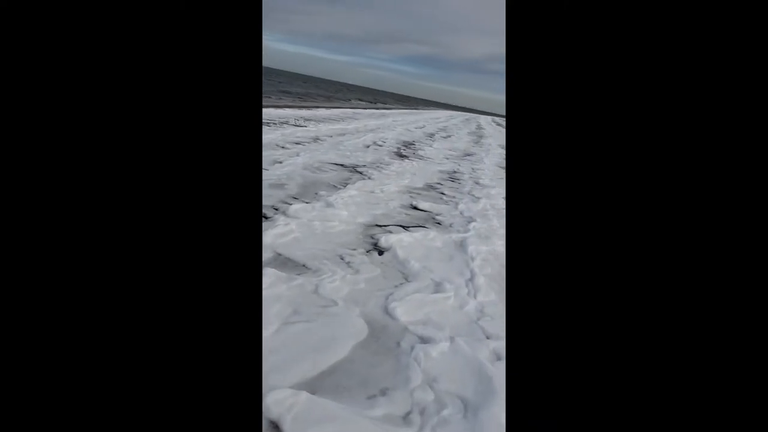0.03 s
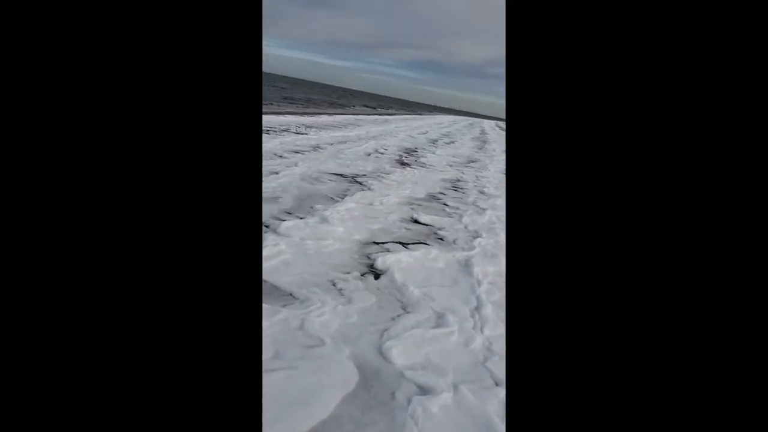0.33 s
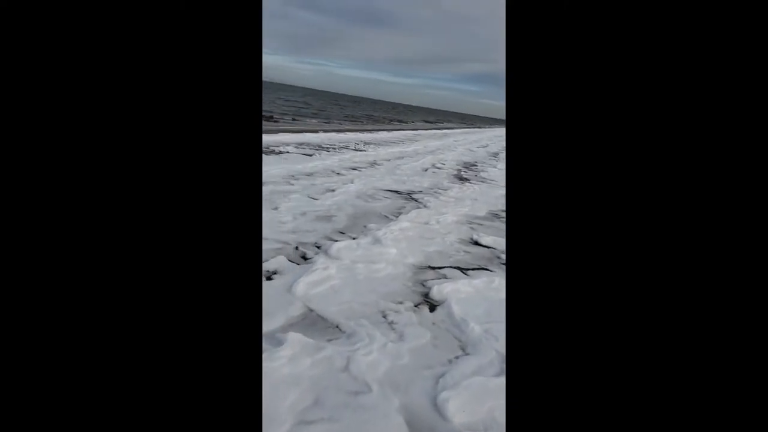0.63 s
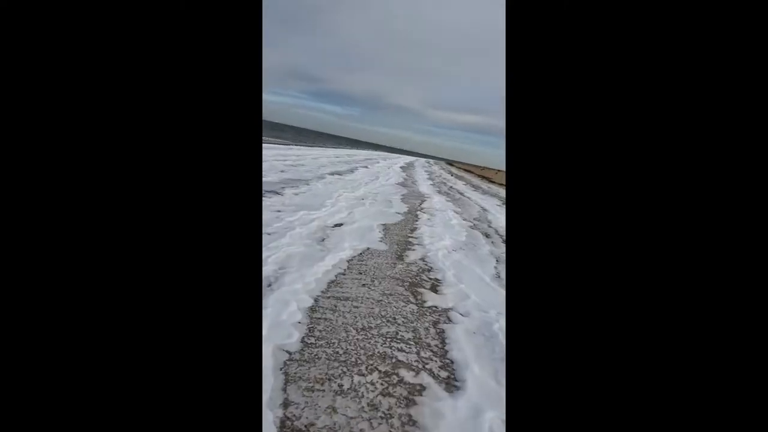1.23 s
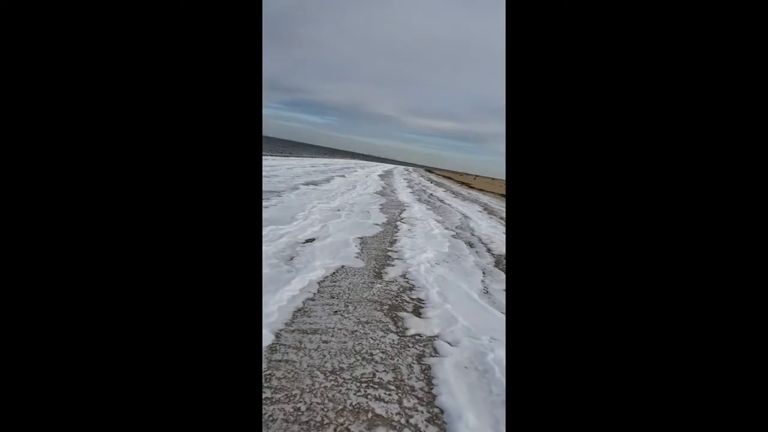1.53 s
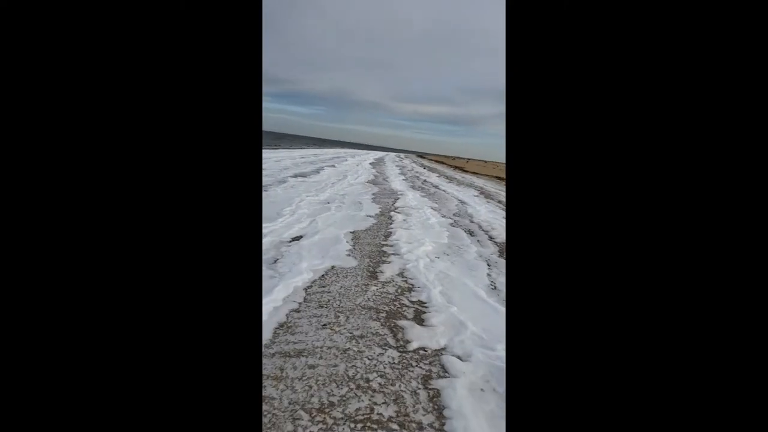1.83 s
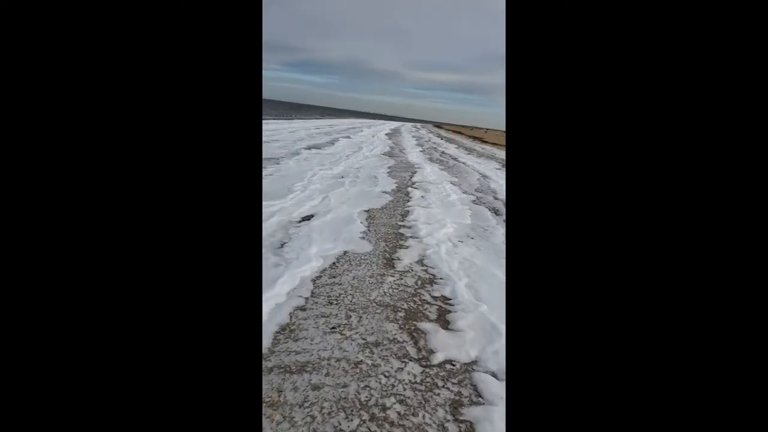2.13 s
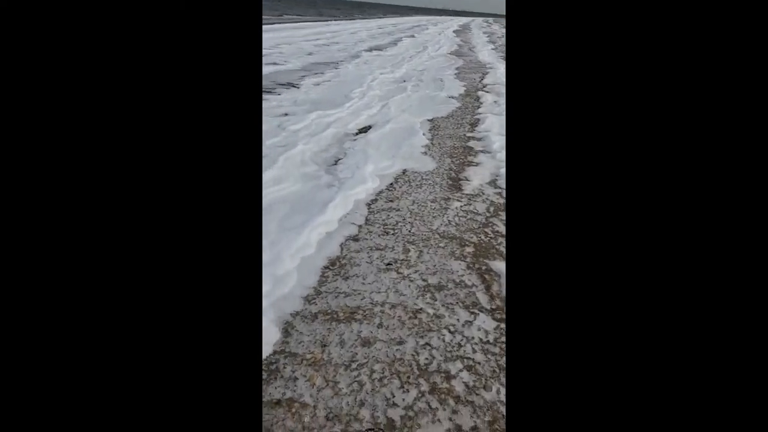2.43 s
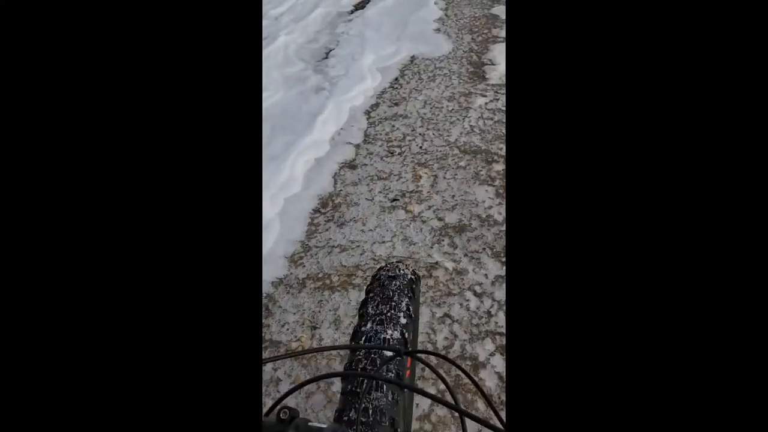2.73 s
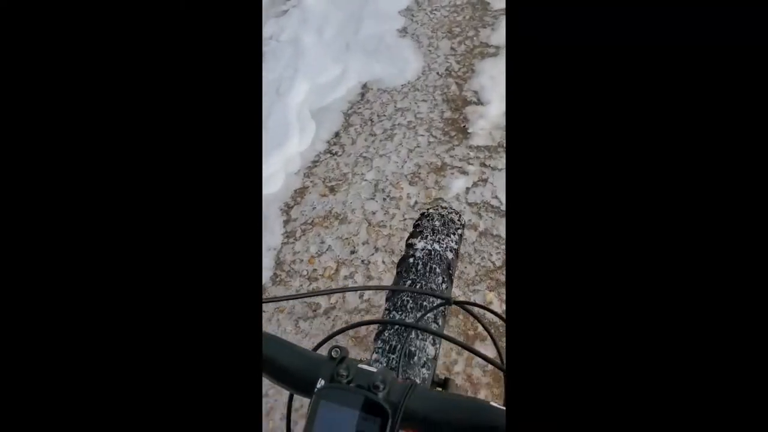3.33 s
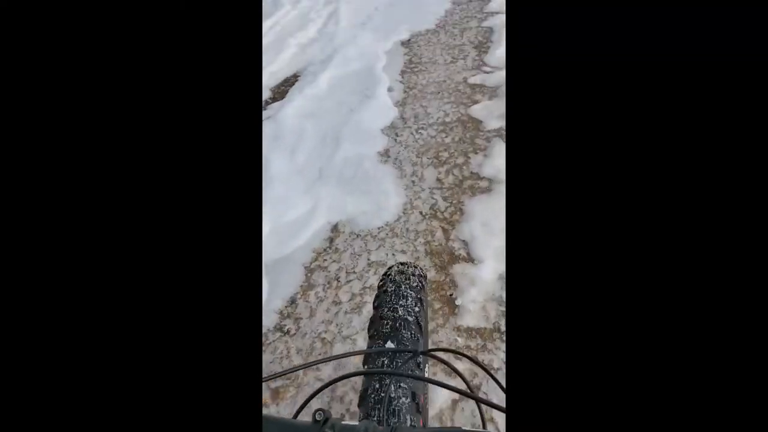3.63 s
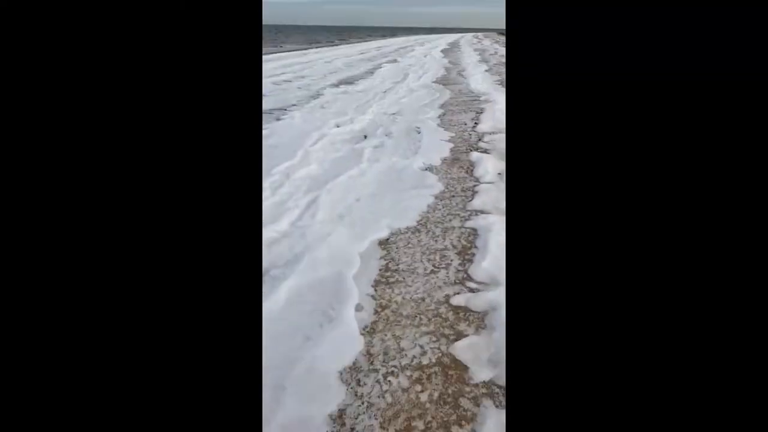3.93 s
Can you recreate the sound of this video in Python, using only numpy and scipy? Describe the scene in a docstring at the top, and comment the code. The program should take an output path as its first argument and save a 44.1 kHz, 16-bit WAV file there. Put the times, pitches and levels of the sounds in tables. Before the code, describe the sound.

A bicycle tyre crunches over crusted snow, then frozen sand, with wind buffeting the microphone.

```python
"""Bicycle on a frozen beach

Heard from a two-port microphone on the rider's chest. A wide tyre crunches through crusted snow;
after a short silent gap it runs on frozen sand, quieter. The crust breaks in dull snaps and the
tread flings ice grit. Wind buffets the ports, hardest around the middle, over a thin hiss."""
import sys
import numpy as np
from scipy import signal
from scipy.fft import rfft, irfft, next_fast_len
from scipy.io import wavfile
from scipy.ndimage import map_coordinates

SR = 44100
rng = np.random.default_rng(int(sys.argv[2]) if len(sys.argv) > 2 else 0)


def pcm_store(signal):
    """Save signal as 16-bit PCM."""
    levels = np.round(np.clip(np.atleast_2d(signal), -1, 1) * 32767)
    wavfile.write(sys.argv[1], SR, levels.astype(np.int16).T)


N = 176400
GAP_START_S, GAP_END_S = 1.048, 1.080


# Snow under the tyre, a body's length from the microphone.
# Each row: time in seconds, relative level in dB.
SNOW_LEVEL = [(0, -34.5), (.11, -36.5), (.2, -38), (.23, -36.5), (.28, -38), (.32, -40.5), (.39, -37.5),
              (.425, -44), (.445, -36), (.52, -43), (.63, -41), (.70, -34), (.77, -40), (.85, -43.5),
              (.9, -40.5), (1.04, -39.5)]
# Each row: frequency in Hz, relative level in dB.
SNOW_SPECTRUM = [(100, -21.5), (250, -3), (550, -3), (850, -2), (1250, -11), (1600, -9), (2000, -13),
                 (2900, -15), (4000, -28.5), (6500, -39.5), (12000, -40)]

def snow():
    """The tyre crushes the crust; the pockets beneath stand out more the harder it presses."""
    press_db = curve(SNOW_LEVEL)
    crust = crunch(SNOW_SPECTRUM, per_s=4000, spread_db=3, clumps_per_s=120, clumped=0.51, rush_db=-3)
    pockets_db = 0.5 + 0.75 * (press_db + 36)  # -36 dB is a firm press
    return amp(press_db) * (amp(6) * crust + amp(pockets_db) * snow_pockets())


# Frozen sand under the same tyre. Each row: time in seconds, relative level in dB.
SAND_LEVEL = [(1.09, -45.5), (1.17, -44), (1.27, -49.5), (1.38, -44), (1.68, -45), (1.87, -48), (2.06, -46),
              (2.25, -46), (2.66, -48), (2.83, -46), (2.95, -50), (3.1, -43), (3.29, -47.5), (3.34, -45),
              (3.42, -48.5), (3.51, -41.5), (3.72, -48.5), (4.0, -46.5)]
# Each row: frequency in Hz, relative level in dB.
SAND_SPECTRUM = [(150, -15.5), (350, 2.5), (1450, -1), (1850, 0), (2150, -8), (2500, -12.5), (3200, -18),
                 (5000, -31), (8000, -41)]

def sand():
    """Frozen sand breaks in fewer, more uneven fractures than snow."""
    crust = crunch(SAND_SPECTRUM, per_s=3000, spread_db=4.5, clumps_per_s=80, clumped=0.8, rush_db=-2.5)
    return amp(curve(SAND_LEVEL) + 4.5) * crust


def crunch(spectrum, per_s, spread_db, clumps_per_s, clumped, rush_db, clump_decay_s=0.0056):
    """Countless fractures under the tread, in clumps that start at once and fade, in a diffuse rush."""
    fade = np.exp(-np.arange(SR // 10) / SR / clump_decay_s)
    clumps = unit(signal.fftconvolve(np.abs(grains(clumps_per_s, 2.4)), fade)[:N])
    fractures = grains(per_s, spread_db) * (1 - clumped + clumped * clumps)
    return unit(ports(crackle(fractures, spectrum)) + amp(rush_db) * surround(spectrum))


def snow_pockets(count=600, pitch_hz=729, scatter_octaves=0.231, t60_s=0.021):
    """Pockets under the snow crust collapse, each ringing briefly at its own pitch."""
    out, t = np.zeros(N + SR), np.arange(SR // 10) / SR
    starts = (np.arange(count) + rng.random(count)) * N / count
    pitches = pitch_hz * 2 ** (scatter_octaves * rng.standard_normal(count))
    for start, hz in zip(starts, pitches):
        out[int(start):][:len(t)] += np.sin(2 * np.pi * hz * t) * amp(-60 * t / t60_s)
    return unit(ports(out[:N]))


# Crust snapping down at the wheel.
# Each row: start in seconds, relative level in dB, resonance of the breaking piece in Hz.
SNAPS = [(.111, -14.5, 2380), (0.392, -22, 800), (.444, -31, 2000), (1.169, -23, 2350), (1.188, -25.5, 740),
         (1.476, -21, 854), (1.516, -23, 1130), (1.609, -28.5, 444), (1.662, -21.5, 1910),
         (1.672, -22, 1500), (1.741, -23.5, 990), (2.134, -26, 1510), (2.314, -21, 750), (2.714, -19, 880),
         (2.819, -20, 1770), (2.832, -22, 1240), (1.579, -27, 920), (1.959, -31.5, 580),
         (2.987, -23.5, 1340), (3.055, -21.5, 1500), (3.071, -16, 1020), (3.088, -17, 650),
         (3.0951, -18, 790), (3.1490, -20.5, 706), (3.166, -15, 1280), (3.335, -25, 1570),
         (3.475, -25, 640), (3.513, -16, 2500), (3.550, -14, 1640), (3.624, -16.5, 840),
         (3.661, -26.5, 660), (3.693, -26, 905)]
# Each row: frequency in Hz, relative level in dB.
SNAP_SPECTRUM = [(80, -9.5), (380, 5), (1350, 3.5), (1900, 4.5), (2400, -10), (3300, -23), (6000, -22),
                 (14000, -48)]

def snaps(step_gap_s=0.001772, crumb_t60_s=0.08):
    """The crust gives way in two quick steps, coloured by the breaking piece; faint crumbs follow."""
    out, t = np.zeros(N + SR), np.arange(SR // 10) / SR
    for start, db, ring_hz in SNAPS:
        force = rng.standard_normal(len(t)) * amp(-23.5 - 60 * t / crumb_t60_s) / 2  # crumbs
        force[0] = -1
        second_step = int(step_gap_s * SR * (.5 + rng.random()))
        force[second_step] -= amp(-8.5)
        snap = amp(db + 2.5) * signal.fftconvolve(force, click(SNAP_SPECTRUM, ring_hz))
        out[round(start * SR):][:len(snap)] += snap
    return ports(out[:N], lag_s=0.00027)


# Ice grit below the microphone. Each row: start in seconds, length in seconds, relative level in dB.
SPRAYS = [(0.913, 0.015, -36), (1.193, 0.06, -51), (1.657, 0.051, -44.5), (1.843, 0.083, -51),
          (2.221, 0.11, -49), (2.828, 0.097, -53), (3.073, 0.093, -49.5)]
# Each row: frequency in Hz, relative level in dB.
GRIT_SPECTRUM = [(1000, -5), (2200, 20.5), (4500, 19), (7000, 13.5), (9000, -65)]

def sprays(attack_s=0.0012):
    """Grit flung off the tread: bright bursts of tiny grains that start fast and fade."""
    t = np.arange(N) / SR
    bursts = np.zeros(N)
    for start, length, db in SPRAYS:
        age = t - start
        bursts += amp(db) * np.clip(age / attack_s, 0, 1) * np.clip(1 - age / length, 0, 1)
    return bursts * ports(crackle(grains(per_s=3300, spread_db=3.9), GRIT_SPECTRUM))


# Airflow right on the microphone. Each row: time in seconds, relative level in dB.
WIND_LEVEL = [(0, -38.5), (.6, -36.5), (1.26, -38), (1.4, -33), (1.7, -32.5), (2.1, -38.5), (2.35, -30),
              (2.78, -39.5), (4.0, -40)]
# Each row: middle in seconds, length in seconds, relative rumble and flutter levels in dB.
GUSTS = [(0.033, 0.023, -21, -46), (0.558, 0.038, -24.5, -38), (0.808, 0.026, -24.5, -51),
         (1.105, 0.053, -30, -25), (1.2, 0.1, -25, -25.5), (1.314, 0.087, -18, -35),
         (1.417, 0.17, -20.5, -37), (1.485, 0.049, -14.5, -33), (1.6, 0.032, -29, -27),
         (1.715, 0.13, -26, -40.5), (1.805, 0.094, -22, -31), (1.93, 0.032, -21.5, -27),
         (2.028, 0.057, -15.5, -36.5), (2.219, 0.04, -18.5, -39), (2.277, 0.028, -22.5, -53),
         (2.476, 0.043, -38, -28.5), (2.882, 0.12, -24.5, -36.5), (2.906, 0.019, -28, -22),
         (3.045, 0.21, -35, -40.5), (3.186, 0.041, -34, -58), (3.453, 0.06, -32.5, -44),
         (3.562, 0.033, -23.5, -42)]
# Each row of both: frequency in Hz, relative level in dB.
RUMBLE_SPECTRUM = [(20, -28), (38, -3), (62, 2), (105, -1), (150, -10.5), (280, -22), (600, -53),
                   (2500, -87)]
FLUTTER_SPECTRUM = [(60, -11.5), (130, -5), (200, 0.5), (300, -4.5), (430, -10.5), (700, -27.5),
                    (3000, -53.5)]

def wind():
    """Eddies hit each port separately; every gust swells a deep rumble and a higher flutter."""
    t = np.arange(N) / SR
    rumble_gain = amp(curve(WIND_LEVEL) + 4.5 + 4.2 * np.array([wobble(28.09), wobble(27.6)]))
    flutter_gain = amp(-11 + 4.6 * wobble(45)) * rumble_gain
    for middle, length, rumble_db, flutter_db in GUSTS:
        swell = np.cos(np.pi * np.clip((t - middle) / length, -.5, .5))
        rumble_gain = np.hypot(rumble_gain, amp(rumble_db + 1) * swell)
        flutter_gain = np.hypot(flutter_gain, amp(flutter_db + 2) * swell)
    rumble = noise(RUMBLE_SPECTRUM)
    flutter = unit(noise(FLUTTER_SPECTRUM) * amp(5.24 * np.array([wobble(90), wobble(90)])))
    return rumble_gain * rumble + flutter_gain * flutter


# Hiss all around the rider. Each row: time in seconds, relative level in dB.
HISS_LEVEL = [(0, -46.5), (.09, -53), (.15, -49), (.32, -50), (.39, -54), (.7, -52), (1.04, -53.5),
              (1.09, -58), (2.15, -59), (2.25, -56.5), (3.42, -56), (3.52, -54), (4.0, -55.5)]
# Each row: frequency in Hz, relative level in dB.
HISS_SPECTRUM = [(1000, 5), (4000, 5), (6000, -1.5), (7800, -3), (9500, 1), (15500, 0.5)]
# Each row: middle in seconds, relative level in dB.
POWDER_PUFFS = [(.312, -56), (.446, -48), (1.025, -47)]

def hiss(puff_half_width_s=0.0085):
    """A thin, grainy hiss of air and frost that flares with each puff of powder snow."""
    t = np.arange(N) / SR
    puffs = sum(amp(db) * np.exp(-((t - middle) / puff_half_width_s) ** 2) for middle, db in POWDER_PUFFS)
    ticks = crackle(grains(per_s=400, spread_db=9), HISS_SPECTRUM)
    gain = amp(curve(HISS_LEVEL) + 5 + 1.2 * wobble(70)) + puffs
    return gain * unit(noise(HISS_SPECTRUM) + amp(-16.5) * ports(ticks))


def ports(x, lag_s=0.00041):
    """Sound from the tyre reaches the right port first, though it is louder on the left."""
    side = np.array([[1], [-1]])
    return amp(1.6 * side) * filtered(x, lambda hz: np.exp(-1j * np.pi * hz * lag_s * side))


def surround(spectrum, port_travel_s=0.00053):
    """Noise from all sides: alike at both ports in the bass, unrelated in the treble."""
    alike = lambda hz: np.sinc(2 * hz * port_travel_s)
    mid, side = filtered(noise(spectrum), lambda hz: np.sqrt([1 + alike(hz), 1 - alike(hz)]))
    return unit(np.array([mid + side, mid - side]))


def grains(per_s, spread_db):
    """Impulses at random times with random sign and size."""
    impulses = (rng.random(N) < per_s / SR) * rng.choice([-1, 1], N)
    return impulses * amp(spread_db * np.clip(rng.standard_normal(N), -2, 2))


def crackle(impulses, spectrum):
    """A click for every impulse, at rms 1 overall."""
    return unit(signal.fftconvolve(impulses, click(spectrum))[:N])


def click(spectrum, ring_hz=None, ring_octaves=0.6, size=1024):
    """A causal click of peak 1 with this spectrum, and a broad resonance if one is given."""
    hz = np.fft.rfftfreq(size, 1 / SR)
    ring_db = 10 * np.exp(-(np.log2((hz + 1) / ring_hz) / ring_octaves) ** 2) if ring_hz else 0
    cepstrum = irfft(np.log(amp(along(spectrum, hz) + ring_db)))
    cepstrum[1:size // 2] *= 2  # fold to minimum phase
    cepstrum[size // 2 + 1:] = 0
    pulse = irfft(np.exp(rfft(cepstrum)))
    return pulse / np.abs(pulse).max()


def noise(spectrum):
    """Coloured noise of rms 1, unrelated at the two ports."""
    return unit(filtered(rng.standard_normal((2, N)), lambda hz: amp(along(spectrum, hz))))


def filtered(x, response):
    """Filter x by a complex response of frequency."""
    size = next_fast_len(N + SR // 2)
    return irfft(rfft(x, size) * response(np.fft.rfftfreq(size, 1 / SR)), size)[..., :N]


def wobble(rate):
    """A smooth random curve, rate knots a second."""
    return map_coordinates(rng.standard_normal(N // 20), [np.arange(N) * rate / SR], mode="wrap")


def curve(rows):
    """Join (seconds, value) points, one value per sample."""
    return np.interp(np.arange(N) / SR, *np.transpose(rows))


def along(spectrum, hz):
    """Join (Hz, dB) points on a log frequency axis."""
    knots_hz, db = np.transpose(spectrum)
    return np.interp(np.log(hz + 1), np.log(knots_hz + 1), db)


def amp(db):
    """Decibels to gain."""
    return 10 ** (np.asarray(db) / 20)


def unit(x):
    """Scale to rms 1."""
    return x / np.sqrt(np.mean(x ** 2) + 1e-20)


def scene():
    """Snow before the gap, sand after it, wind throughout."""
    tyre = np.where(np.arange(N) / SR < GAP_START_S, snow(), sand())
    return tyre + snaps() + sprays() + wind() + hiss()


def record(dry, fade_s=0.002, top_hz=15800):
    """The sound falls away into the gap and returns at once; nothing passes above the band limit."""
    t = np.arange(N) / SR
    fade = np.exp(-np.maximum(t - GAP_START_S, 0) / fade_s)
    gate = np.where(t < GAP_END_S, fade, 1)
    return filtered(dry * gate, lambda hz: hz < top_hz)


dry = scene()
out = record(dry)
pcm_store(out)
```